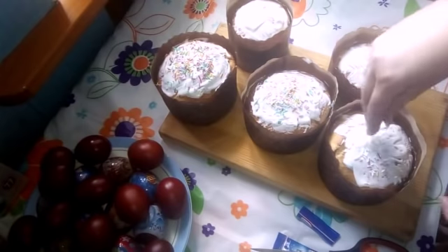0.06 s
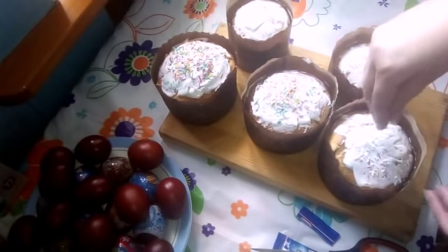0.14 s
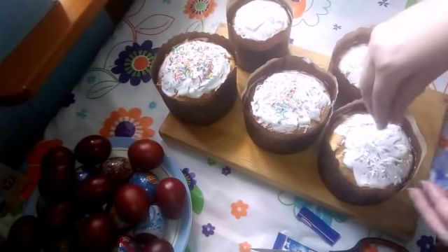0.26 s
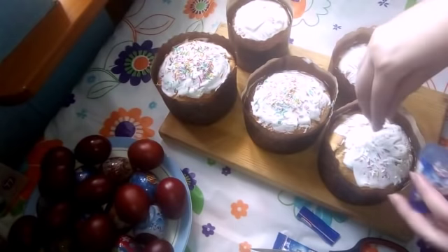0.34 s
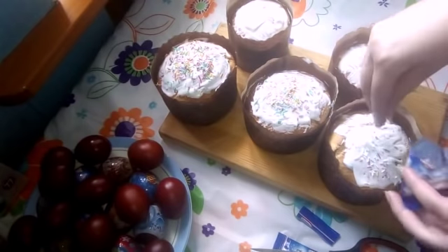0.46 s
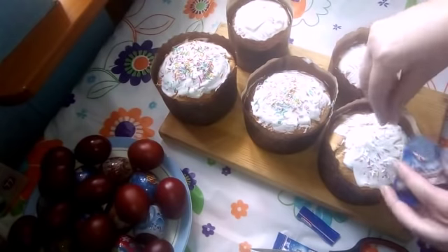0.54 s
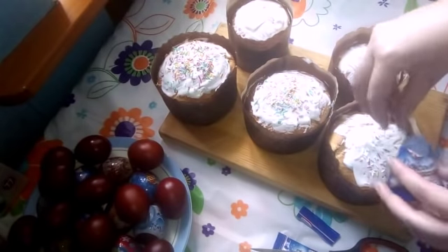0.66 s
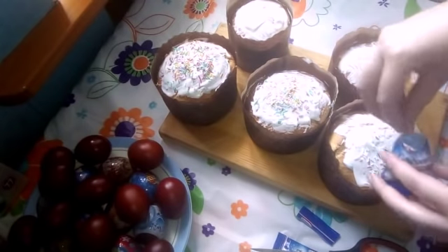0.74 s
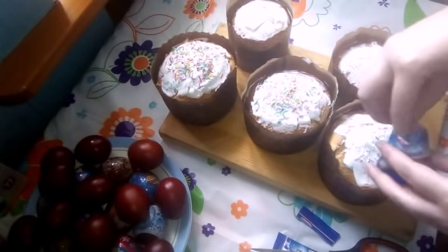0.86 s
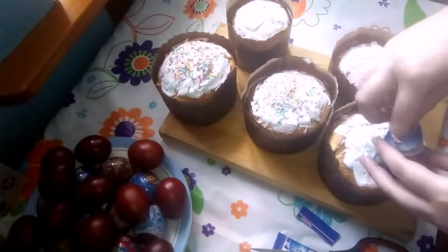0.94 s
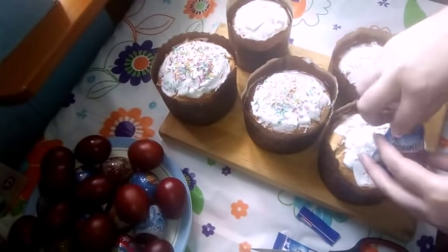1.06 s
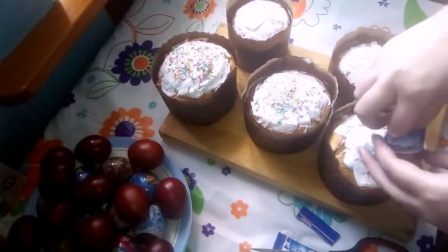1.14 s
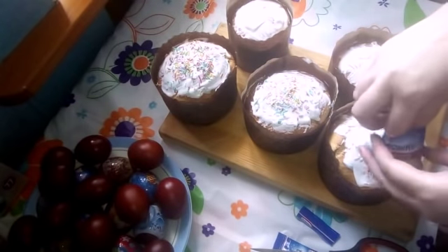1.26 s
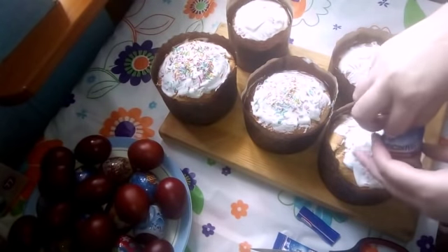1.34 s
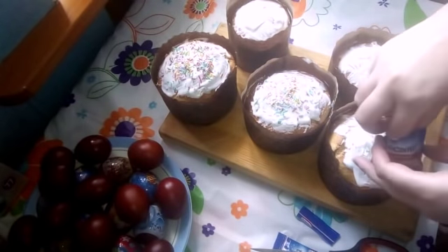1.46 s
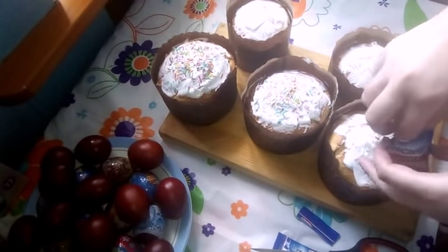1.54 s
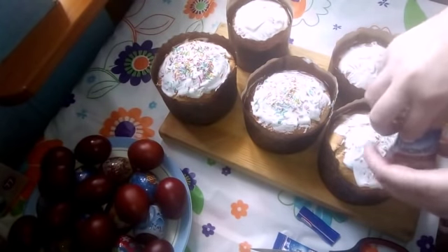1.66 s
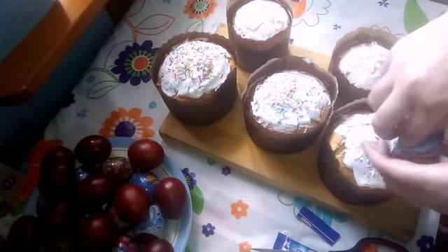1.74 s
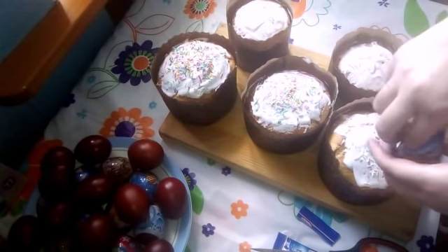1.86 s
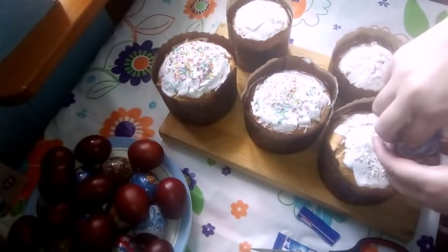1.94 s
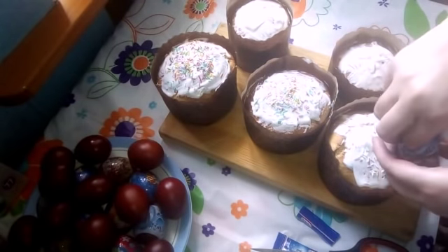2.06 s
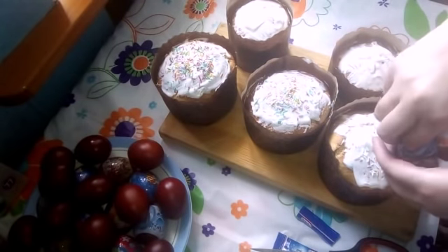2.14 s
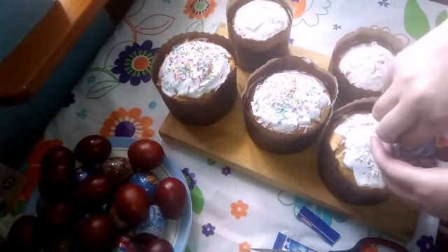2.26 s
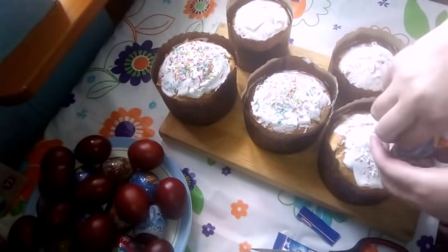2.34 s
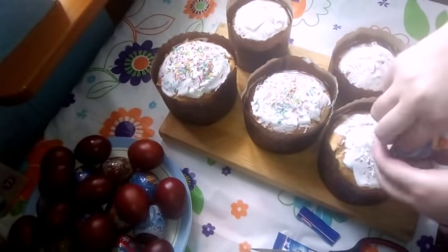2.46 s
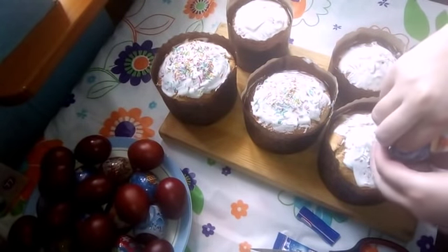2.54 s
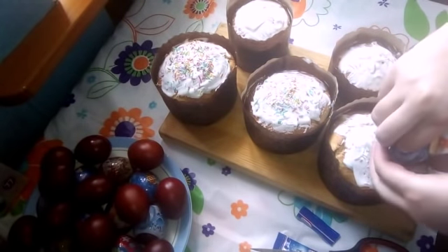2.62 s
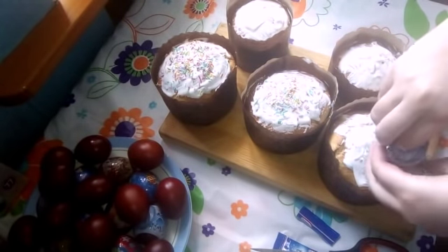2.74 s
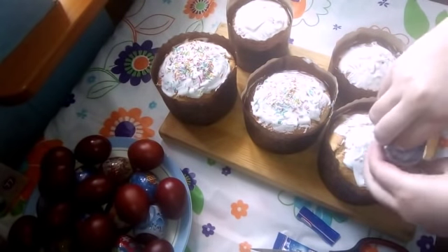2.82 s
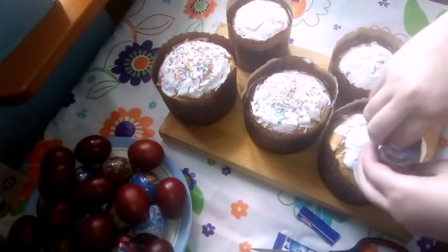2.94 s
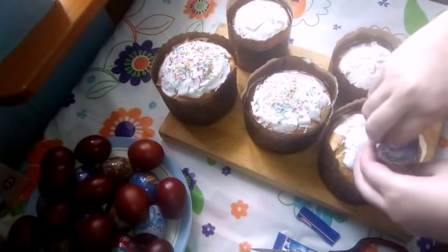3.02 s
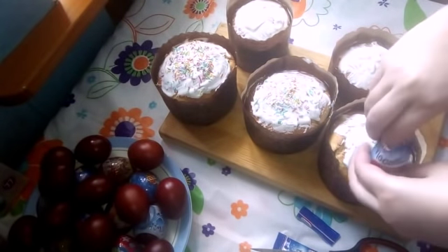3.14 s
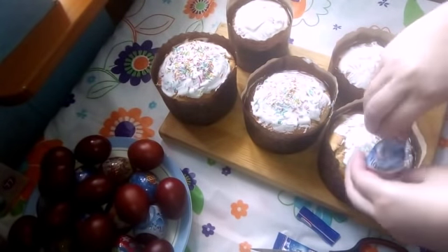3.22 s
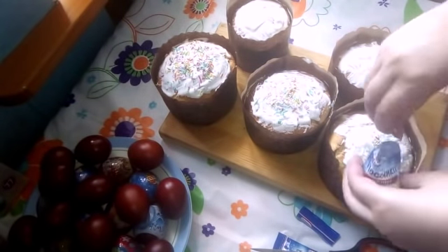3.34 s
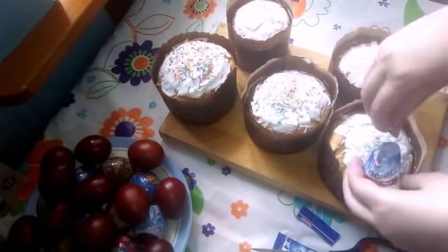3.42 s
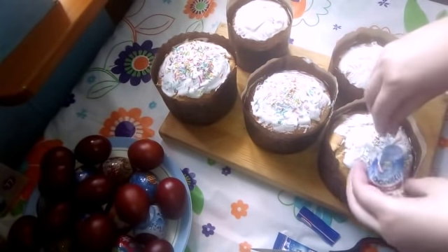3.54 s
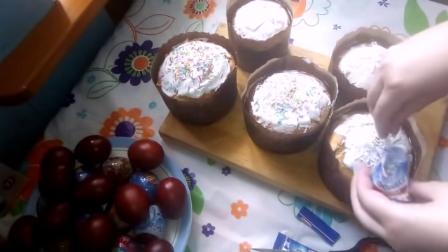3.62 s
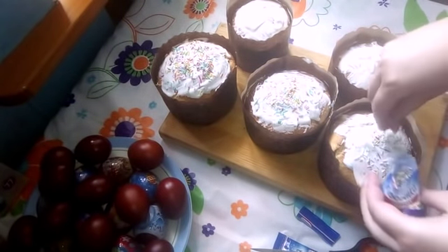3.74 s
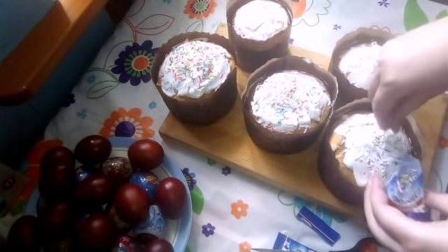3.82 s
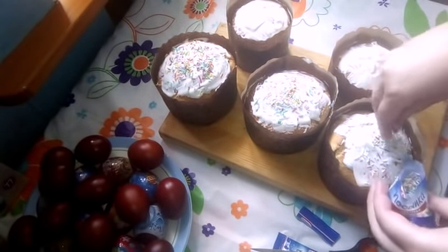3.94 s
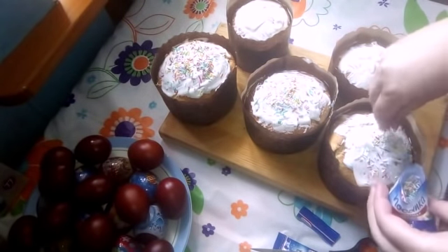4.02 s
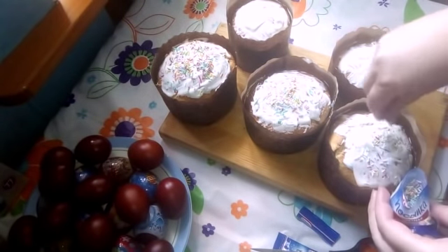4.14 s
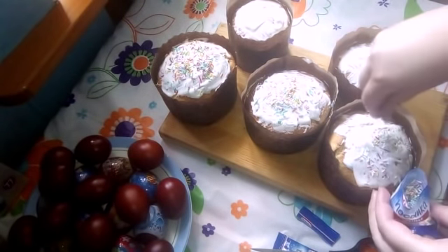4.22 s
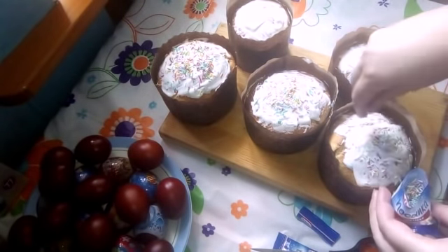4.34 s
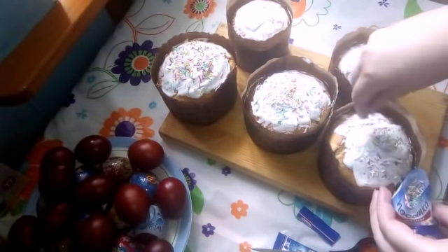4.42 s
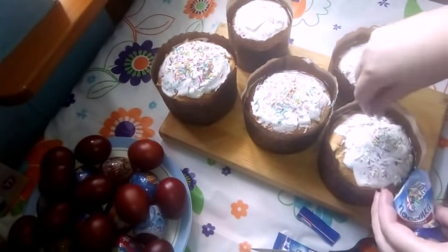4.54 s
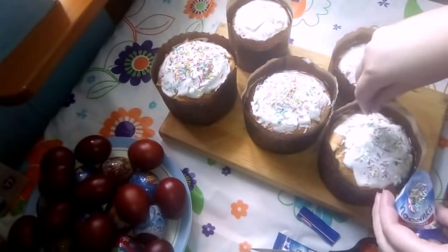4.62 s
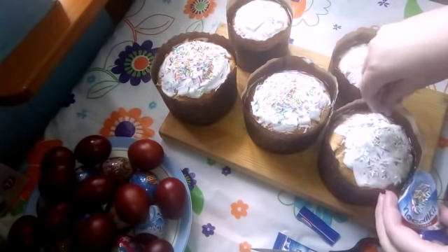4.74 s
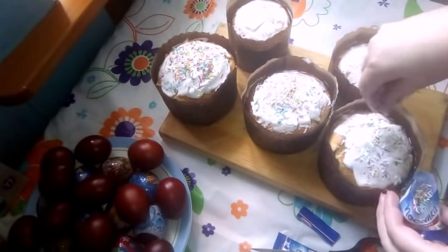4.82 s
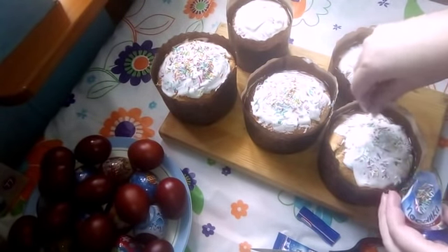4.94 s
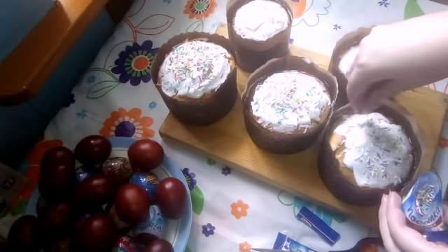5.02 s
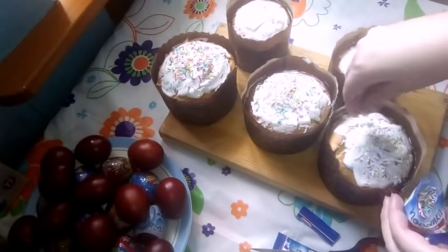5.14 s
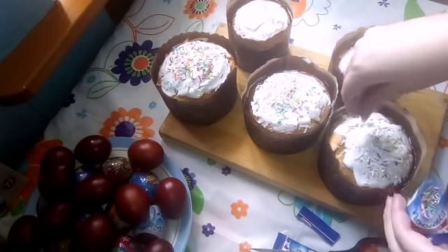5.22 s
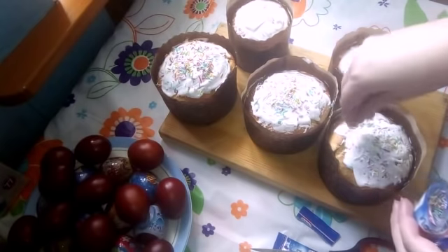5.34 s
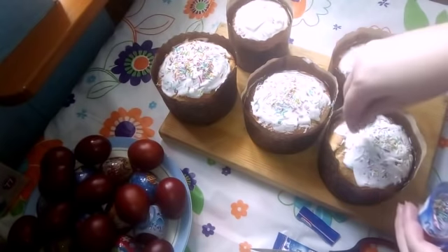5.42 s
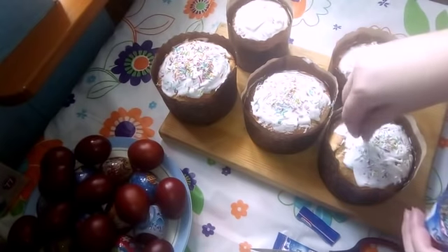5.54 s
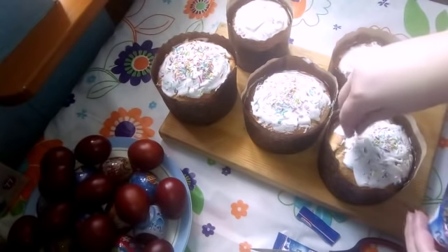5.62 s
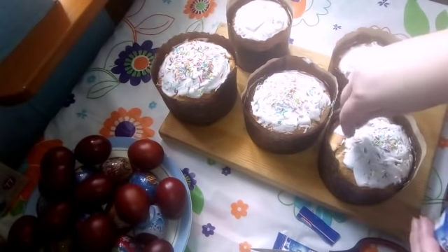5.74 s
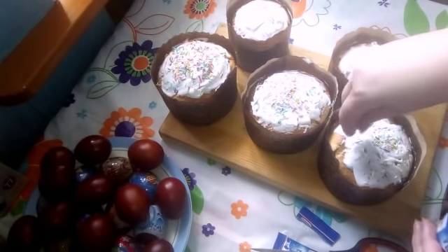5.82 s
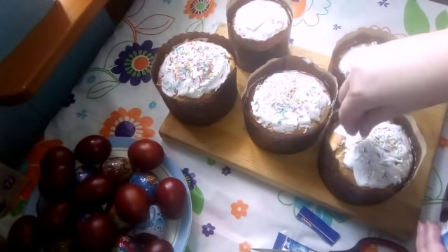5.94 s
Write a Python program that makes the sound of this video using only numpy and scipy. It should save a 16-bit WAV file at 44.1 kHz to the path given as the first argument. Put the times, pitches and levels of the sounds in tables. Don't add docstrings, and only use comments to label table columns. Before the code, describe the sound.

Dry, bright plastic crackling with fine gritty patter, recorded in stereo by a small camera on a kitchen table. One early snap leads to clusters of sharp pops as fingers dig for sprinkles, and a last loud pair of cracks just before three seconds. The packet then moves away with scattered light clicks, barely audible film squeaks and a late small crinkle, over quiet low room tone. Grains landing on the cakes are not heard.

```python
import sys
import numpy as np
from scipy import signal
from scipy.io import wavfile
from scipy.ndimage import uniform_filter1d

SR = 44100
rng = np.random.default_rng(int(sys.argv[2]) if len(sys.argv) > 2 else 0)


def natural_amplitude(level_db):
    exponent = np.asarray(level_db, float) / 20
    return 10 ** exponent


def dump_mix(stems):
    frames = np.atleast_2d(stems).T
    limited = np.clip(frames, -1, 1)
    pcm = np.round(limited * 32767).astype(np.int16)
    wavfile.write(sys.argv[1], SR, pcm)


N = 263277

# t/s, snap level/dB, panel level re snap/dB, panel f/Hz, crease level re snap/dB
HARD_SNAPS = [(0.4227, -25, -4, 1700, -11.5), (0.9278, -25, -6, 1900, -12.5),
              (0.9462, -21, -17.5, 930, -21), (0.989, -13.5, -23.5, 774, -13.5),
              (1.0202, -10.5, -27, 1040, -15.5), (1.033, -21.5, -7, 1580, -37),
              (1.1546, -29, -1.5, 1870, -7.5), (1.3164, -20.5, -9.5, 1316, -11.5),
              (1.6252, -28, -8, 1520, -12.5), (1.6374, -22.5, -16, 1700, -23),
              (1.742, -15.5, -9.5, 1540, -17), (1.8475, -19.5, -6.5, 1900, -8.5),
              (1.9378, -15.5, -20, 2070, -18), (2.0644, -18, -9.5, 2260, -13),
              (2.0712, -18, -5.5, 2120, -11), (2.092, -16.5, -11, 1460, -16.5),
              (2.8506, -13.5, -19.5, 1554, -43), (2.8896, -9.5, -9.5, 1640, -15),
              (3.1928, -30, -26, 1840, -53), (3.3335, -28, -8, 1750, -16.5),
              (3.6109, -34.5, -0.5, 1643, -6.5), (4.2814, -37, 0, 3770, -25),
              (5.2774, -30.5, -13.5, 2320, -11.5), (5.5373, -26.5, -26.5, 1760, -47)]
# t/s, snap level/dB, panel level re snap/dB, panel f/Hz
SLIPS = [(0.2059, -54, -29.5, 851), (0.545, -48.5, -20, 2090), (0.7945, -35, -7, 1490),
         (0.9213, -37.5, -8.5, 1600), (1.001, -26, -4, 2220), (1.0502, -26.5, -40, 1550),
         (1.1825, -27, -10.5, 1870), (1.2139, -36.5, -4.5, 1820), (1.2874, -30, -24.5, 1100),
         (1.425, -32, -12, 1960), (1.48, -44.5, -28, 1390), (1.4923, -34.5, -35, 1760),
         (1.5981, -45.5, -14, 1870), (2.0467, -35, -10, 2560), (2.1464, -29.5, -9.5, 1690),
         (2.1957, -28.5, -32, 2600), (2.2978, -26, -53, 2250), (2.363, -38, -33, 2530),
         (2.4124, -33, -31, 2250), (2.4581, -35.5, -17, 2250), (2.5024, -39, -13, 2590),
         (2.5154, -36, -15.5, 2220), (2.536, -41, -11, 2220), (2.554, -34, -17, 2220),
         (2.5756, -41.5, -3.5, 1860), (2.6825, -58, -25, 1930), (2.802, -52, -6.5, 2360),
         (2.8262, -43, -12.5, 2530)]
# t/s, snap level/dB, panel level re snap/dB, panel f/Hz
TICKS = [(3.1576, -45, -39, 950), (3.2465, -41.5, -10.5, 2400), (3.3093, -39, -6, 2210),
         (3.3784, -35.5, -10.5, 1730), (3.6032, -33, -16.5, 1280), (3.659, -41, -7.5, 1460),
         (3.751, -33, -25, 1600), (3.7858, -31.5, -19.5, 1155), (3.819, -33.5, -22, 1190),
         (3.84, -39, -16, 2300), (3.867, -38, -5, 2480), (3.9526, -51.5, -19, 860),
         (4.2133, -33, -14, 1420), (4.322, -40.5, -27, 2300), (4.498, -29, -27.5, 1073),
         (4.5272, -49.5, -7, 2230), (4.6376, -33, -14.5, 1340), (4.665, -41, -10, 1390),
         (4.701, -44, -6, 2640), (5.1183, -47.5, 4.5, 3350), (5.1232, -43, -16, 1550),
         (5.2946, -26.5, -26, 2390), (5.3212, -27, -13.5, 2230), (5.3277, -29, -19, 2320),
         (5.395, -35, -21, 2060), (5.423, -44.5, -9, 2630), (5.472, -49, -18, 2560)]
SLIP_CREASE_DB, TICK_CREASE_DB = -13, -15.5
CREASES = (
    HARD_SNAPS
    + [(*row, SLIP_CREASE_DB) for row in SLIPS]
    + [(*row, TICK_CREASE_DB) for row in TICKS]
)
SNAP_AIR_DB, AIR_PER_DB = -25, 0.79
AWAY_S, AWAY_DB = 3.0, -0.5

# t/s, level/dB, rise/s, fall/s, wall share/dB (rise and fall span 20 dB)
STROKES = [(1.06, -49, 0.14, 0.24, -1.5), (1.162, -46, 0.065, 0.17, -8.5), (1.31, -59, .1, 0.071, 2),
           (1.43, -49.5, 0.048, 0.067, -5.5), (1.62, -54.5, 0.027, 0.1, -5), (1.86, -54, 0.089, 0.22, -2),
           (2.09, -50, 0.055, 0.058, 2), (2.27, -49, 0.9, 0.78, -5), (2.5, -52.5, 0.52, 0.2, -6),
           (2.83, -51, 0.055, 0.12, -5.5), (3.3, -60.5, 0.13, 0.15, 1.5), (3.389, -54.5, 0.15, 0.029, -9),
           (3.78, -60, 0.078, 0.32, -9.5), (3.879, -57.5, .15, 0.066, -9.5), (4.1, -82.5, 0.079, .1, 12),
           (4.28, -64.5, 0.18, 0.2, 2.5), (4.51, -71.5, 0.11, 0.46, -4.5),
           (5.379, -58.5, 0.15, 0.13, -11.5), (5.55, -58, 0.024, 0.094, -6)]
# f/Hz, level/dB
GRAIN_COLOUR = [(2000, -44), (3000, -9.5), (4500, -3), (6200, -4), (7500, -20.5), (10000, -22.5),
                (13000, -35), (16000, -53.5)]
# f/Hz, level/dB
WALL_COLOUR = [(600, -64), (1300, -15.5), (1700, 3.5), (2100, 5), (2600, 10.5), (3300, -33), (6000, -47)]
# f/Hz, level/dB
SLIDE_COLOUR = [(300, -59), (600, -15), (1050, 3), (1450, 4.5), (2000, -27.5), (4000, -57)]
FIZZ_DB, FIZZ_POWER = -26, 1.42
REST_DB, SLIDE_SHARE_DB = -81.5, -22
SHAKE_WALL_DB, SHAKE_SLIDE_DB, SHAKE_S = -27, -16, 0.062
LEVEL_STEP = 32

# t/s, level/dB, f/Hz, half width/s
SQUEAKS = [
    (4.09, -71, 1074, 0.065),
    (4.41, -68.5, 1120, 0.037),
]

# f/Hz, level/dB
HEARD_COLOUR = [(800, 1), (1050, 2.5), (1300, -4.5), (1600, 1), (4500, 0), (6300, 0), (8000, 1.5),
                (12000, -2)]
# f/Hz, level/dB
SHADOW = [(400, 0), (1300, -1), (2400, -6), (3500, -11), (6000, -13), (9000, -8), (14000, -9)]
# t/s, left port level/dB
TURN = [
    (0, -23),
    (1, 0.1),
    (2, 0.5),
    (2.7, -2),
    (3.3, 0.5),
    (4.5, -3),
    (5.2, -1.5),
    (5.97, -4),
]
# f/Hz, t60/s
DECAY = [(300, 0.78), (1000, 0.27), (2000, 0.21), (6000, 0.22), (10000, 0.15), (15000, 0.12)]

# f/Hz, level/dB, width/Hz, left port lead/rad
HUM = [(236.5, -83, 8.9, 0.19), (486.4, -79.5, 4.2, 1.2), (681, -79, 6.3, 0.96), (731.4, -65.5, 18, 1.52)]
# t/s, level/dB, half width/s
SWELLS = [(.38, -83, 0.088), (.95, -76, 0.046), (1.47, -63.5, 0.054), (1.63, -57, .05), (1.86, -58, 0.088),
          (2.12, -66, 0.035), (2.35, -66.5, 0.34), (2.88, -60.5, 0.037), (3.05, -60.5, 0.065),
          (3.36, -63, 0.11), (3.6, -71, 0.2), (4.249, -70, 0.074), (5.79, -63, 0.055)]
RUMBLE_DB = -75.5
# f/Hz, level per Hz/dB
AIR = [(20, -12.5), (40, -15.5), (95, 2), (170, -6), (300, -5.5), (600, -9.5), (800, -9.5), (1000, -17),
       (2400, -20), (4000, -20.5), (5800, -23), (7500, -31), (12500, -32.5), (16000, -63.5)]
AIR_DB = -62.5
# f/Hz, left-right likeness
LIKENESS = [(60, 0.18), (640, 0.17), (1400, 0.11), (15000, 0.016)]

# f/Hz, level/dB
KEPT = [(6500, -125), (7800, -108), (9000, -106), (11000, -108), (13500, -106), (16000, -101.5)]
# t/s, length/s, level/dB
MUTES = [
    (0.9412, 0.0073, -35),
    (0.976, 0.0061, 3.5),
    (1.007, 0.0081, -7),
    (1.3107, 0.0035, -12),
    (1.728, 0.0037, -18),
    (2.83, 0.0036, -1),
]


def snaps():
    out, t = np.zeros(N), np.arange(900) / SR
    creak = natural_amplitude(-12 - 20 * (1 - t / 0.00094))
    afterslip = natural_amplitude(-13 - 60 * t / 0.026) + natural_amplitude(-30 - 60 * t / 0.21)
    shape = np.where(t < .0012, creak, afterslip)
    for s, db, panel_db, panel_hz, crease_db in CREASES:
        chance = rng.standard_normal(900)
        slips = chance * abs(chance) * shape
        slips[53] = 3.95
        panel = passed(slips, panel_hz * 0.3, panel_hz * 3.9)
        air_db = SNAP_AIR_DB + AIR_PER_DB * (db + 19) + AWAY_DB * (s > AWAY_S) + 15
        parts = [
            (passed(slips, 510, 846), pouch_level(panel_db, panel_hz)),
            (passed(panel, panel_hz * 0.87, panel_hz * 1.422), panel_db + 7),
            (passed(slips, 2977, 4230), crease_db + 10),
            (passed(slips, 4456, 6250), -1.5),
            (passed(slips, 7100, 10000), air_db),
        ]
        for part, part_db in parts:
            add(out, s - .0008, natural_amplitude(db + part_db + 2) * part / abs(part).max())
    return signal.sosfilt(signal.butter(4, 300, "high", fs=SR, output="sos"), out)


def pouch_level(panel_db, panel_hz):
    return panel_db - 10.0 - 14 * np.log2(panel_hz / 1200)


def rustle():
    grain, wall, sliding = handling()
    clumps = evened(uniform_filter1d(rng.standard_normal(N), 700))
    hardness_db = 2.4 * np.minimum(rng.exponential(1, N), 6) + 2.6 * clumps
    clicks = rng.standard_normal(N) * natural_amplitude(hardness_db)
    clicks *= rng.random(N) < 5000 / SR
    kind = rng.integers(0, 7, N)
    grains = np.zeros(N)
    for k, hz in enumerate(np.geomspace(1200, 11000, num=7)):
        grains += passed(clicks * (kind == k), hz * 0.78, hz * 1.295) / np.sqrt(hz)
    grains = np.diff(grains, prepend=0) / 2 + 0.3 * grains
    high, low, slide = [
        evened(signal.oaconvolve(grains, causal(colour))[:N])
        for colour in (GRAIN_COLOUR, WALL_COLOUR, SLIDE_COLOUR)
    ]
    fizz_gain = natural_amplitude(FIZZ_DB - 50) * (grain / natural_amplitude(-52.5)) ** FIZZ_POWER
    fizz = fizz_gain * evened(passed(clicks, 7500, 14000))
    return grain * high + fizz + wall * low + sliding * slide


def handling():
    strokes = [peak(s, db, rise, fall) for s, db, rise, fall, _ in STROKES]
    walls = [stroke + row[4] for stroke, row in zip(strokes, STROKES)]
    shaken, slid = [], []
    for s, db, panel_db, hz, _ in CREASES:
        stiff_db = 30 * max(np.log2(hz / 2600), 0)
        shaken.append(peak(s, db + panel_db + SHAKE_WALL_DB - stiff_db, 0.012, SHAKE_S))
        slid.append(peak(s, db + pouch_level(panel_db, hz) + SHAKE_SLIDE_DB, .004, SHAKE_S))
    levels = (
        summed(strokes + [REST_DB]),
        summed(walls + shaken + [REST_DB - 10]),
        summed(slid + [summed(walls) + SLIDE_SHARE_DB, REST_DB - 2.5]),
    )
    return [np.repeat(natural_amplitude(db + 2.0), LEVEL_STEP)[:N] for db in levels]


def peak(s, db, rise, fall):
    late = np.arange(0, N + LEVEL_STEP, LEVEL_STEP) / SR - s
    return db - 20 * np.maximum(late / max(fall, .002), -late / max(rise, .002))


def squeak():
    t, out, noise = np.arange(N) / SR, np.zeros(N), rng.standard_normal(N)
    for s, db, hz, width in SQUEAKS:
        swell = np.exp(-((t - s) / width) ** 2)
        out += natural_amplitude(db) * swell * evened(passed(noise, hz * .96, hz * 1.04))
    return out


def at_ports(packet):
    far = signal.oaconvolve(np.r_[np.zeros(7), packet], causal(SHADOW))[:N]
    bends = passed(far, 140, 1200)
    far = far + natural_amplitude(-13) * np.roll(far, 31) - natural_amplitude(-8) * np.roll(far, 74)
    left = natural_amplitude(0.5) * bends + (far - bends) * natural_amplitude(curve(TURN)[0])
    return np.array([left, packet])


def kitchen(x):
    taps = np.zeros((3, SR // 2))
    at = np.arange(120, SR // 2 - 10, 10)
    at = at + rng.integers(0, 10, (3, len(at)))
    np.put_along_axis(taps, at, rng.choice([-1., 1.], at.shape), 1)
    taps = taps[:2] + 0.37 * np.array([np.roll(taps[2], 7), taps[2]])
    hz, t, z = signal.stft(taps, SR, nperseg=128)
    decay = natural_amplitude(-60 * t / read(DECAY, hz)[:, None])
    tail = signal.istft(z * decay, SR, nperseg=128)[1]
    return signal.fftconvolve(x[None], tail / np.linalg.norm(tail[0]), axes=1)[:, :N]


def refrigerator():
    t, out = np.arange(N) / SR, np.zeros((2, N))
    for hz, db, width, lead in HUM:
        slow = signal.butter(1, 6 * width, fs=SR, output="sos")
        waver = signal.sosfiltfilt(slow, rng.standard_normal((2, N)))
        waver = 1 + 0.09 * (evened(waver[0]) + 1j * evened(waver[1]))
        phase = 2 * np.pi * hz * t + np.array([[lead], [0]])
        out += np.sqrt(2) * natural_amplitude(db) * (waver * np.exp(1j * phase)).real
    return out


def rumble():
    noise = rng.standard_normal((3, N))
    band = signal.butter(2, (110, 185), "band", fs=SR, output="sos")
    t = np.arange(N) / SR
    level = natural_amplitude(RUMBLE_DB) + sum(natural_amplitude(db) * np.exp(-((t - s) / width) ** 2) for s, db, width in SWELLS)
    return level * natural_amplitude(-4.8) * evened(signal.sosfilt(band, noise[:2] + 0.28 * noise[2]))


def room_tone():
    frames, hz = N // 512 + 5, np.fft.rfftfreq(2048, 1 / SR)
    a, b, c, d = rng.standard_normal((frames, 1025, 4)).T
    same = np.clip(read(LIKENESS, hz), -1, 1)[:, None]
    left = a + 1j * b
    right = same * left + np.sqrt(1 - same ** 2) * (c + 1j * d)
    z = np.array([left, right]) * natural_amplitude(read(AIR, hz)[:, None])
    hiss = signal.istft(z, nperseg=2048, noverlap=1536)[1][:, :N]
    return natural_amplitude(AIR_DB - 5.5) * evened(hiss) * natural_amplitude([[-.8], [.8]])


def passed(x, lo_hz, hi_hz):
    return signal.sosfilt(signal.butter(2, (lo_hz, hi_hz), "band", fs=SR, output="sos"), x)


def causal(points):
    log_gain = np.log(natural_amplitude(read(points, abs(np.fft.fftfreq(2048, 1 / SR)))))
    return np.fft.ifft(np.exp(np.conj(signal.hilbert(log_gain)))).real[:1024]


def evened(x):
    return x / np.sqrt(np.mean(x ** 2) + 1e-20)


def summed(levels_db):
    return 10 * np.log10(sum(natural_amplitude(db) ** 2 for db in levels_db) + 1e-20)


def read(points, hz):
    f, value = np.transpose(points)
    return np.interp(np.log(hz + 1), np.log(f + 1), value)


def curve(rows):
    s, *columns = np.transpose(rows)
    return [np.interp(np.arange(N) / SR, s, c) for c in columns]


def add(mix, s, sound):
    part = mix[round(s * SR):][:len(sound)]
    part += sound[:len(part)]


def scene():
    packet = signal.oaconvolve(snaps() + rustle(), causal(HEARD_COLOUR))[:N]
    handled = at_ports(packet) + squeak() * natural_amplitude([[-2.5], [0]])
    echoes = natural_amplitude([[-10], [-7.5]]) * kitchen(packet)
    return handled + echoes + refrigerator() + rumble() + room_tone()


def band_limit(x):
    return signal.sosfilt(signal.butter(12, 16510, fs=SR, output="sos"), x)


def record(dry):
    hz, _, z = signal.stft(dry, SR, nperseg=1024, noverlap=768)
    power = uniform_filter1d(abs(z) ** 2, size=3, axis=1)
    power = uniform_filter1d(power, size=3, axis=2)
    loud_db = 10 * np.log10(power[:, 60:170].mean(axis=1, keepdims=True) + 1e-20)
    masked_db = 0.33 * np.maximum(loud_db + 101, 0)
    z *= 10 * np.log10(power + 1e-20) > read(KEPT, hz)[:, None] + masked_db
    kept = signal.istft(z, SR, nperseg=1024, noverlap=768)[1][:, :N]
    t = np.arange(N) / SR
    mute_db = sum(db * np.exp(-(2 * (t - s) / length) ** 4) for s, length, db in MUTES)
    return band_limit(kept * natural_amplitude(mute_db))


dry = scene()
out = record(dry)
dump_mix(out)
```